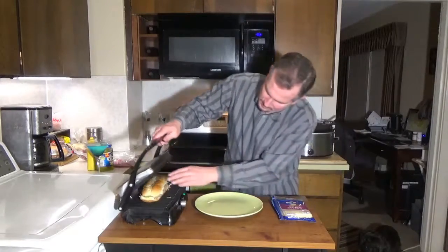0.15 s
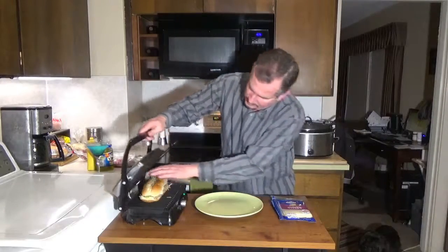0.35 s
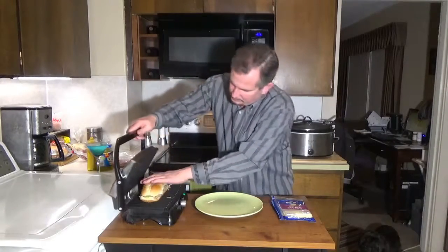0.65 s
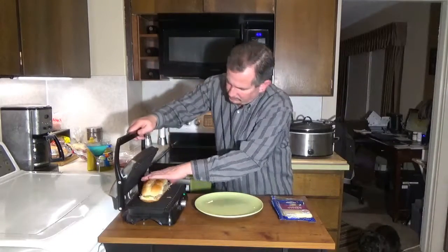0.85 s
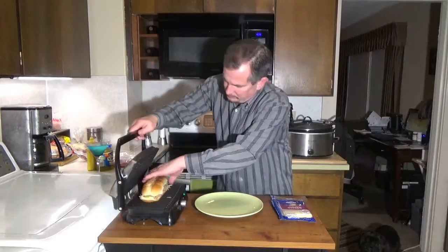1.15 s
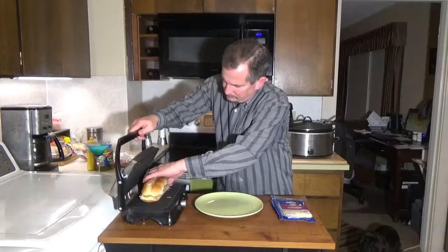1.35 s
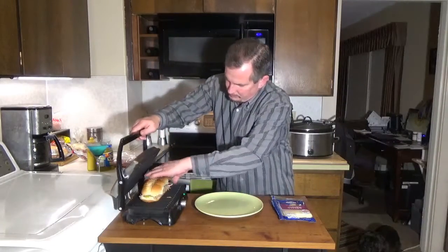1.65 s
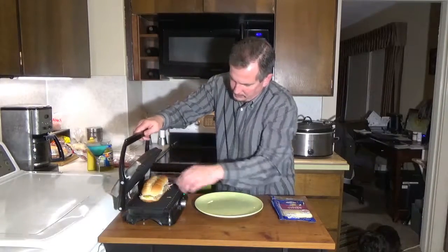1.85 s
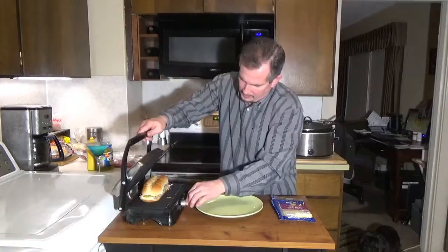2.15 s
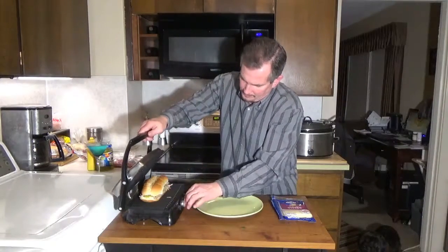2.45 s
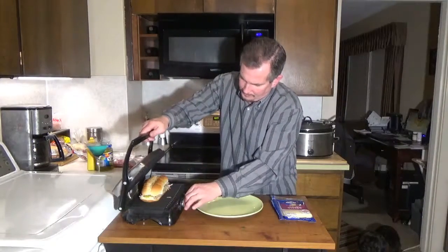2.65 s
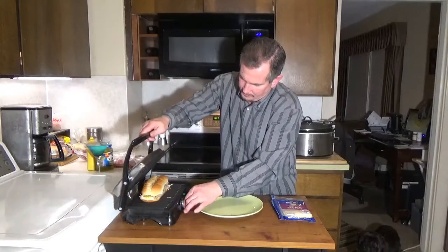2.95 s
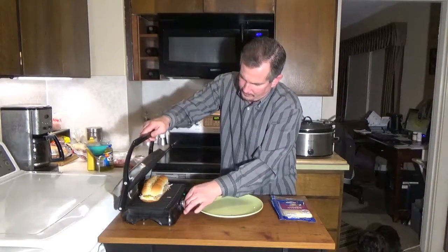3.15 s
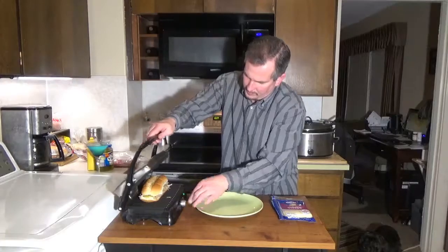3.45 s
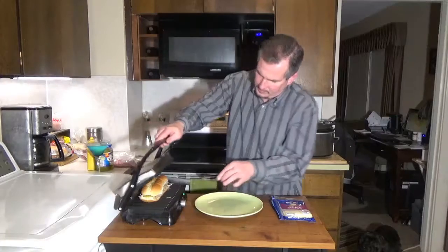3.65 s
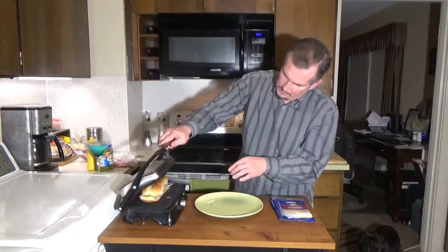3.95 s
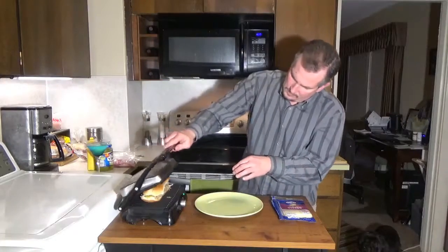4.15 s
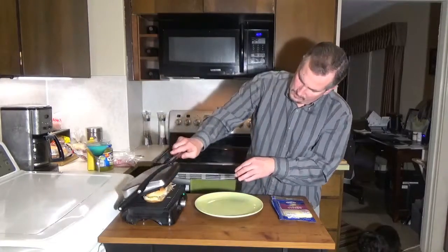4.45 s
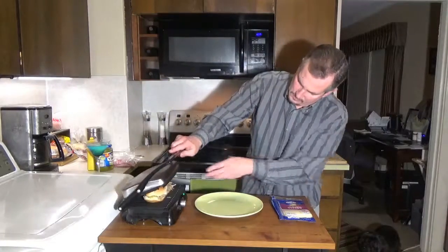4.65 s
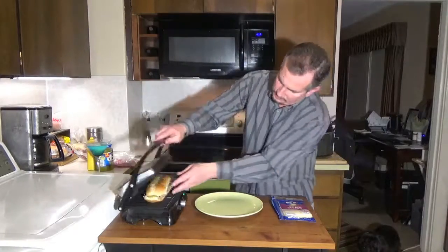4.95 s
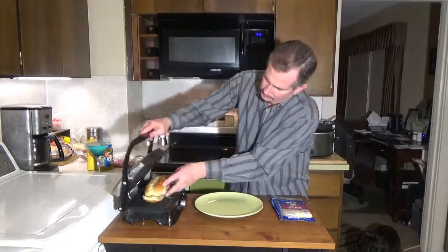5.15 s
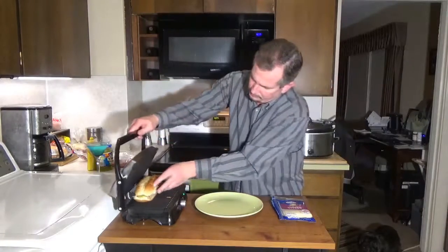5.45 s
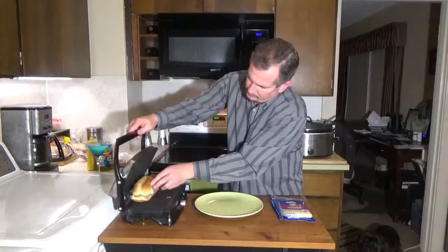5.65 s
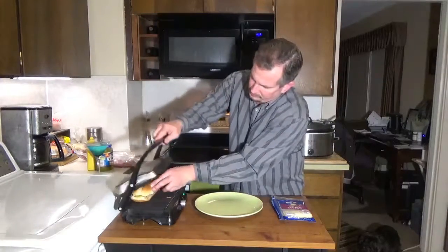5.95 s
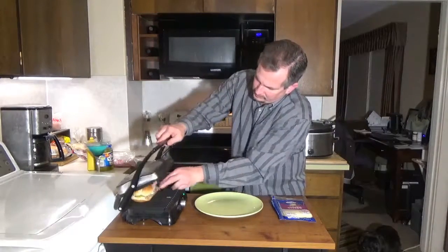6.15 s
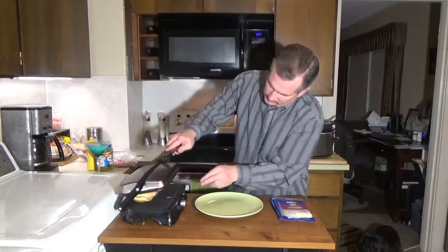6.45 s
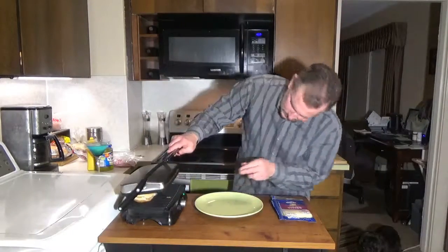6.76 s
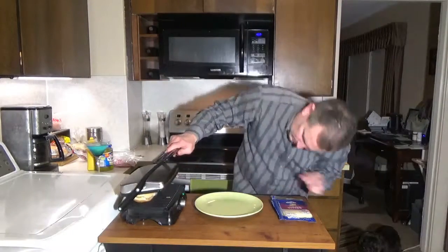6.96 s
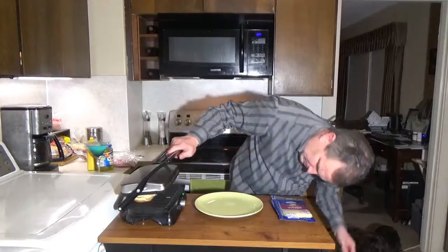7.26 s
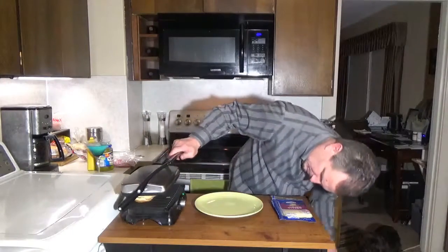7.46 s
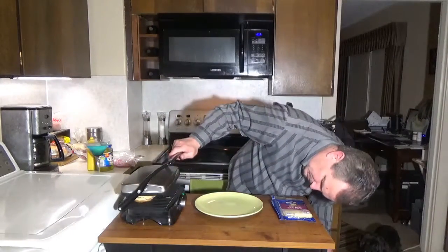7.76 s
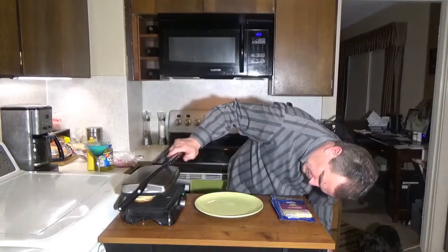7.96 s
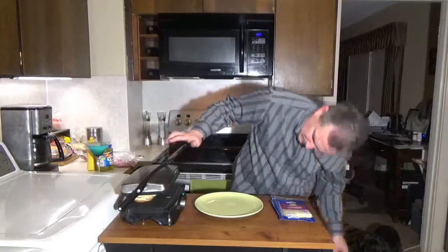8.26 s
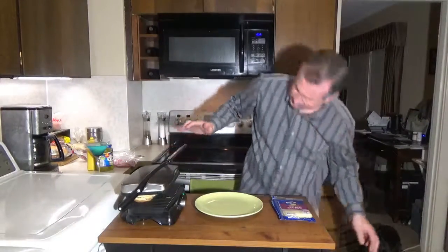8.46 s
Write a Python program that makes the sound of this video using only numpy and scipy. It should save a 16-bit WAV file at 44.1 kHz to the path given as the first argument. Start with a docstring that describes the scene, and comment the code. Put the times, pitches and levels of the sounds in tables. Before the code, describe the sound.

In a small, hard-surfaced kitchen, a refrigerator and fan hum steadily while a sandwich press sizzles faintly and ticks with heat. The handle taps and the grill plate clinks, then the dial snaps through seven sharp clicks. The sizzle swells softly, and the lid knocks and rattles as it is lowered, with a sleeve rustling. A few faint ticks follow. The microphone is fairly near, and each impact rings briefly in the room.

```python
"""A sandwich press sizzles and ticks in a small hard kitchen, over a refrigerator's hum, fan noise and
a faint focus motor. At first the handle taps, the lid knocks and a sleeve begins to rustle; at 1.7 s
the grill plate clinks. From 2.7 s the dial's spring snaps through seven detents. Then the sandwich is
squeezed and its steam swells, and from 4 to 6.7 s the lid knocks and rattles as it is lowered. The room
rings briefly after each impact. Last come a tap, two ticks and a brush of cloth."""
import sys
import numpy as np
from scipy import signal
from scipy.fft import rfft, irfft, next_fast_len
from scipy.io import wavfile

SR = 44100
rng = np.random.default_rng(int(sys.argv[2]) if len(sys.argv) > 2 else 0)


def digitize_waveform(pressure):
    """Quantize a signal to 16-bit integers and store it at the path in sys.argv[1].

    Rows of a 2-D input are taken as channels; values are limited to [-1, 1].
    """
    field = np.atleast_2d(pressure).T
    bounded = np.clip(field, -1, 1)
    quanta = np.round(bounded * 32767).astype(np.int16)
    wavfile.write(sys.argv[1], SR, quanta)


N = 379260
T = np.arange(N) / SR
RING_T = T[:SR // 2]  # time axis of one impact
SIDES = np.array([[1], [-1]])  # left, right


def undb(db):
    """Amplitude ratio of a level in decibels."""
    return 10 ** (np.asarray(db) / 20)

def level(x, db, size=None):
    """Normalisation: the rms of the first size samples (or of all) is set to db."""
    return x * undb(db) / np.sqrt(np.mean(x[..., :size] ** 2))

def shape(x, gain_at):
    """Minimum-phase filter: folding the cepstrum makes the magnitude gain_at(f) causal."""
    size = next_fast_len(len(x) // 2 + 1024) * 2
    f = np.maximum(np.fft.rfftfreq(size, 1 / SR), 1)
    cepstrum = irfft(np.log(gain_at(f) + 1e-9))
    cepstrum[1:size // 2] *= 2
    cepstrum[size // 2 + 1:] = 0
    return irfft(rfft(x, size) * np.exp(rfft(cepstrum)))[:len(x)]

def colour(x, spectrum, tilt_db=0):
    """Spectral weighting by (f/Hz, level/dB) points, tilted by tilt_db per octave above 1500 Hz."""
    hz, db = np.transpose(spectrum)
    octaves = lambda f: np.log2(np.maximum(f / 1500, 1))
    return shape(x, lambda f: undb(np.interp(np.log(f), np.log(hz), db) + tilt_db * octaves(f)))

def fade(t60):
    """Exponential damping: the level falls 60 dB in t60 seconds."""
    return undb(-60 * RING_T / max(t60, 1e-4))

def burst(t60):
    """Modal overlap: modes too dense to tell apart decay as noise."""
    return rng.standard_normal(len(RING_T)) * fade(t60)

def ring(modes, detune=0.0025):
    """Free vibration: a sum of damped sines, a little different at each blow."""
    out = np.zeros(len(RING_T))
    for hz, db, t60 in modes:
        detuned_hz = hz * (1 + detune * rng.standard_normal())
        out += undb(db) * fade(t60) * np.sin(2 * np.pi * (detuned_hz * RING_T + rng.random()))
    return out

def add(track, t, sound):
    """Superposition: a sound joins the track at t seconds."""
    start = max(int(t * SR), 0)
    track[..., start:start + sound.shape[-1]] += sound[..., :N - start]

# diffuse sound at two close microphones: f/Hz, side minus mid level/dB
SIDE_SPECTRUM = [(60, -4), (140, -19.5), (280, -17.5), (550, -11.5), (1100, -5), (4000, -6.5), (9000, -8.5)]
def diffuse(make):
    """Partial coherence of a diffuse field: independent draws form the mid and side signals."""
    return make() + SIDES * colour(make(), SIDE_SPECTRUM)

def kitchen(x, bass_t60=0.46, treble_t60=0.18, crossover_hz=4000, full_s=0.0036, build_s=0.0052):
    """Reverberation of unit energy: cupboard reflections build up within ms; the treble dies first."""
    def tail():
        bass = shape(burst(bass_t60), lambda f: 1 / np.hypot(1, f / crossover_hz))
        treble = shape(burst(treble_t60), lambda f: 1 / np.hypot(1, crossover_hz / f))
        return (bass + treble) * np.clip((RING_T - full_s) / build_s + 1, 0, 1)
    response = diffuse(tail)
    response /= np.sqrt(np.sum(response ** 2) / 2)
    return signal.fftconvolve(x[None], response, axes=1)[:, :N]

# fan rumble and microphone hiss: f/Hz, relative level/dB
AIR_SPECTRUM = [(25, -17), (60, -25.5), (125, -9), (205, 3.5), (265, -1), (385, 2), (470, -5), (650, -9.5),
                (900, -11.5), (1200, -18.5), (2200, -22), (4500, -27), (8500, -29.5), (11000, -30)]
def fan_and_hiss(db=-50.5):
    """Stationary broadband noise: a fan rumbles under an even hiss."""
    return level(diffuse(lambda: colour(rng.standard_normal(N), AIR_SPECTRUM)), db)

# tones of the compressor and fans: f/Hz, rms level/dB
HUM_LINES = [(59.4, -70), (80.7, -66), (101, -73), (119.9, -61), (161.6, -62), (178, -68), (197.0, -62),
             (197.6, -52.7), (237.4, -65), (281.9, -68), (296.7, -60), (317.6, -60), (324, -67), (356, -59),
             (415.3, -63), (474.8, -71)]
def refrigerator(wander_rad=0.17):
    """Line spectrum of motors: the phases wander slowly, and two close tones beat."""
    knots = np.linspace(0, T[-1], num=18)
    out = np.zeros(N)
    for hz, db in HUM_LINES:
        drift = wander_rad * np.interp(T, knots, rng.standard_normal(len(knots)))
        out += np.sqrt(2) * undb(db) * np.sin(2 * np.pi * (hz * T + rng.random()) + drift)
    return out

# runs of a lens focus motor: start t/s, end t/s, whine f/Hz, level/dB
MOTOR_RUNS = [(0, 7.67, 4025, -72.3), (7.67, 7.9, 3330, -69.5), (8.11, 8.18, 3300, -68)]
def focus_motor(steps_per_s=29.97, pulse_s=0.0053, jitter_hz=60, uneven_db=1.8):
    """Pulse modulation: the motor whines in short steps of uneven pitch and strength."""
    step, phase = np.divmod(T * steps_per_s, 1)
    detune, force = rng.standard_normal((int(step[-1]) + 1, 2))[step.astype(int)].T
    pulses = np.exp(-((phase - 0.5) / steps_per_s / pulse_s) ** 2) * undb(uneven_db * force)
    out = np.zeros(N)
    for start, end, hz, db in MOTOR_RUNS:
        whine = np.sin(2 * np.pi * np.cumsum(hz + jitter_hz * detune) / SR)
        out += level(pulses * whine, db) * (T >= start) * (T < end)
    return out

# steam bursts: f/Hz, relative level/dB
STEAM_SPECTRUM = [(500, -28), (3000, -21), (5500, -5.5), (8000, -4.5), (9800, -0.5), (11000, -9),
                  (13000, -12.5)]
# the sandwich is squeezed on the hot plate: start t/s, end t/s, full level/dB, build-up time/s
SANDWICH_SQUEEZES = [(0, 0.25, -60, 0.018), (3.2, 4.8, -54, 1.25), (4.92, 5.423, -54.7, 0.03),
                     (5.93, 8.6, -64, 0.021)]
def sizzle(pops_per_s=1800, spread_db=3.5, simmer_db=-61.5, release_s=0.11):
    """Shot noise of tiny steam bursts: it swells under a squeeze, then relaxes to a simmer."""
    pops = (rng.random(N) < pops_per_s / SR) * rng.choice([-1, 1], N)
    sizes = undb(spread_db * np.minimum(rng.exponential(size=N), 7))
    steam = colour(pops * sizes, STEAM_SPECTRUM)
    power = undb(simmer_db) ** 2
    for start, end, db, build_s in SANDWICH_SQUEEZES:
        build = 1 - np.exp(-np.maximum(T - start, 0) / build_s)
        release = np.exp(-np.maximum(T - end, 0) / release_s)
        power += (undb(db) * build * release) ** 2
    return level(steam + kitchen(steam), 0) * np.sqrt(power)

# rubbing cloth: f/Hz, relative level/dB
CLOTH_SPECTRUM = [(200, -21), (600, 12.5), (1200, 6.5), (2500, 4.5), (4500, 2.5), (7000, 4), (9800, 1.5),
                  (11000, 1.5)]
# reaches of the arm: fastest at t/s, relative level/dB, length/s
ARM_STROKES = [(0.17, -54.5, 0.62), (0.95, -62, 0.7), (2.098, -58, 0.27), (3.28, -51, 0.28),
               (3.952, -55.5, 1), (4.75, -49.5, 0.32), (5.056, -51.5, 0.17), (5.43, -48.5, 0.22),
               (5.76, -55, 0.25), (6.09, -53, 0.14), (6.298, -45, 0.12), (6.88, -54.5, 0.45),
               (8.47, -52, 0.18)]
def sleeve(grain_db=2.0, gain_db=-1, stir_db=-56.5, rise_share=0.55):
    """Stick-slip friction: fibres shed grains of noise that swell and die with the arm's speed."""
    def fibres():
        grains = undb(grain_db * np.repeat(rng.standard_normal(N // 64 + 1), 64)[:N])
        return colour(rng.standard_normal(N) * grains, CLOTH_SPECTRUM)
    power = undb(stir_db) ** 2  # the cloth also stirs between strokes
    for t, db, length_s in ARM_STROKES:
        width_s = length_s * np.where(T < t, rise_share, 1 - rise_share)
        power += undb(db) ** 2 * np.exp(-((T - t) / width_s) ** 2)
    return level(diffuse(fibres), gain_db) * np.sqrt(power)

# taps of the plastic handle: t/s, level/dB, resonance f/Hz, sharpness Q
HANDLE_TAPS = [(0.019, -51.5, 4000, 3.9), (0.073, -41.5, 2600, 3.6), (4.3839, -41.5, 3570, 0.6),
               (6.871, -45.5, 2300, 1.4)]
def handle(t60=0.026):
    """Damped resonance: each tap excites one broad band of the handle."""
    out = np.zeros(N)
    for t, db, hz, q in HANDLE_TAPS:
        resonance = lambda f: 1 / (1 + (q * (f / hz - hz / f) / 2) ** 2) ** 2
        add(out, t, level(shape(burst(t60), resonance), db, size=220))
    return out + kitchen(out)

# a dry tick: f/Hz, relative level/dB
TICK_SPECTRUM = [(60, -35), (300, -3), (1000, -6), (2200, 4.5), (4000, 3), (7000, 5.5), (10500, 6),
                 (13000, -9)]
# ticks of the hot plates and the crust: t/s, level/dB
HEAT_TICKS = [(0.0394, -45.5), (0.7199, -43), (1.2645, -49), (1.3703, -50.5), (1.821, -41.5),
              (1.9239, -31.5), (3.8826, -41), (3.9095, -43), (3.9769, -46.5), (4.4472, -42.5),
              (4.798, -36.5), (5.3915, -43), (6.2601, -33.5), (7.2329, -44), (7.9888, -47)]
def ticks(typical_db=-41, crackle_db=-23):
    """Impulsive release: weaker ticks come from smaller spots, so are brighter and stir the room less."""
    out, to_room = np.zeros(N), np.zeros(N)
    for t, db in HEAT_TICKS:
        excess_db = db - typical_db
        release = (RING_T == 0) + undb(crackle_db) * burst(t60=0.02)
        tick = level(colour(release, TICK_SPECTRUM, tilt_db=1.1 - 0.2 * excess_db), db, size=176)
        add(out, t, tick)
        add(to_room, t, tick * undb(-2.5 + 0.22 * excess_db))
    return out + kitchen(to_room)

# modes of the grill plate: f/Hz, relative level/dB, T60/s
GRILL_MODES = [(806, -2, 0.13), (898, -6.5, 0.23), (1464, -8.5, 0.5), (2540, 2, 0.034), (3330, 1, 0.053),
               (4100, -16, 0.065), (5140, 2, 0.056), (5580, 4, 0.06), (5600, -9, 0.33), (5900, -11, 0.096),
               (6150, 10.5, 0.027), (6120, 1, 0.054), (8840, 5.5, 0.05), (9050, -1, 0.046),
               (9200, -12, 0.064)]
# the plate clinks in its seat: t/s, level/dB
GRILL_CLINKS = [(1.7232, -34.5)]
def grill_plate(scrape_t60=0.19, scrape_db=-3, room_db=-4):
    """Inharmonic plate modes ring over a scrape, which shares the spectrum of the dial's snap."""
    out = np.zeros(N)
    for t, db in GRILL_CLINKS:
        scrape = level(colour(burst(scrape_t60), SNAP_SPECTRUM), scrape_db, size=441)
        body = level(ring(GRILL_MODES), 0, size=441)
        add(out, t, level(scrape + body, db, size=441))
    return out + undb(room_db) * kitchen(out)

# modes of the lid and base: f/Hz, relative level/dB, T60/s
BODY_MODES = [(159, -8, .25), (205, -4, .25), (250, -6, .2), (377, 1, .4), (443, -7, .3), (492, -5, .35),
              (590, -10, .25), (624, -6, .55), (750, -6, .22), (882, -1, .32), (935, -2, .27),
              (1004, -1, .35), (1091, 2, .3), (1192, -11, .3), (1464, -12, .3), (1541, -8, .26),
              (1760, -11, .18), (2369, -10, .24), (2556, -4, .3), (2720, -4, .26), (2993, -5, .22),
              (3494, -9, .2), (4829, -15, .2)]
# the lid's loose parts: f/Hz, relative level/dB
CLATTER_SPECTRUM = [(100, -5), (200, 3.5), (550, 4.5), (1050, -2.5), (1300, -2), (1800, 0.5), (2200, -7.5),
                    (2900, 3.5), (4000, -5), (5500, 2.5), (10000, -11)]
# knocks of the lid: t/s, level/dB, upper cutoff f/Hz
LID_KNOCKS = [(0.262, -46.5, 5000), (0.27, -43.5, 2700), (2.58, -51, 2000), (4.039, -53.5, 1200),
              (4.276, -43.5, 1550), (4.385, -51, 2400), (4.561, -48, 503), (4.581, -29.5, 3100),
              (4.604, -33.5, 1150), (4.983, -46, 1350), (5.178, -51, 1200), (5.578, -52, 1400),
              (6.236, -43.5, 800), (6.253, -40, 865), (6.403, -48.5, 1000), (6.725, -42.5, 1720)]
def lid(clatter_t60=0.091, bounces=4, bounce_db=-8, part_db=-4, clatter_room_db=-1, body_room_db=-9):
    """Impact and rebound of the loose top plate: soft contacts lose the treble, light ones the bass."""
    out, to_room = np.zeros(N), np.zeros(N)
    for t, db, top_hz in LID_KNOCKS:
        weight = 2 ** ((db + 45) / 12)  # 12 dB more reaches an octave lower and rattles twice as long
        low_hz, rattle_s = 310 / weight, 0.02 * weight
        clatter = colour(burst(clatter_t60), CLATTER_SPECTRUM)
        for delay_s in rng.random(bounces) * rattle_s:
            bounce = undb(bounce_db) * colour(burst(clatter_t60 / 2), CLATTER_SPECTRUM)
            clatter += np.pad(bounce, (int(delay_s * SR), 0))[:len(RING_T)]
        contact = lambda f: 1 / np.hypot(1, (f / top_hz) ** 3) / np.hypot(1, (low_hz / f) ** 2)
        clatter = level(shape(clatter, contact), db + part_db, size=1323)
        body = level(shape(ring(BODY_MODES), contact), db + part_db, size=1323)
        add(out, t, clatter + body)
        add(to_room, t, undb(clatter_room_db) * clatter + undb(body_room_db) * body)
    return out + kitchen(to_room)

# modes of a spring inside the dial: f/Hz, relative level/dB, T60/s
TWANG_MODES = [(780, 1.5, 0.41), (814, -1.5, 0.3), (1308, -16, 1)]
# the spring is struck: t/s, level/dB
SPRING_TWANGS = [(2.727, -40.5)]
def dial_spring(room_db=-10):
    """Lightly damped vibration: the struck spring rings on."""
    out = np.zeros(N)
    for t, db in SPRING_TWANGS:
        add(out, t, level(ring(TWANG_MODES), db, size=4410))
    return out + undb(room_db) * kitchen(out)

# first contact of the detent spring, and its snap: f/Hz, relative level/dB
CRACK_SPECTRUM = [(100, -27), (2000, -17), (5000, -8), (9500, 4.5), (11000, -7)]
SNAP_SPECTRUM = [(50, -33), (200, -15), (800, -3), (2000, -5), (3500, 3), (7000, 2), (9500, -11),
                 (11000, -2.5)]
# modes of the dial's housing: f/Hz, relative level/dB, T60/s
HOUSING_MODES = [(1488, -11.5, 0.11), (2820, 1, 0.027), (3430, -4, 0.013), (4210, 3, 0.027),
                 (4870, -6, 0.016), (5370, 6, 0.026), (6200, 6, 0.016), (6500, 6, 0.016), (7200, 6, 0.028),
                 (7550, -2, 0.052), (8800, 9.5, 0.014), (9100, -10, .015), (9460, 9, 0.01),
                 (10300, 0, 0.013)]
# clicks of the dial: t/s, level/dB, treble tilt/(dB per octave)
DIAL_DETENTS = [(2.6894, -21.5, 1.1), (2.7251, -21.5, 0), (2.7579, -23, 0.4), (2.8354, -20.5, 1.8),
                (2.8715, -20, 2), (2.9563, -21, 2), (3.1245, -22, -0.6)]
def dial(slide_s=0.012, slide_db=-30, room_db=-0.5, housing_room_db=-6, beam_hz=7800):
    """Release of elastic energy: at each detent a spring slides up a ramp, then strikes the housing."""
    out = np.zeros((2, N))
    attack = 176  # samples, 4 ms
    flat = [(1000, 0), (11000, 0)]
    slide_band = lambda f: 1 / np.hypot(1, f / 2500) / np.hypot(1, 600 / f)
    for t, db, tilt_db in DIAL_DETENTS:
        slide = shape(rng.standard_normal(600), slide_band) * np.hanning(600)
        add(out, t - slide_s, level(slide, db + slide_db))
        crack = level(colour(burst(t60=0.0041), CRACK_SPECTRUM), -2, attack)
        snap = level(colour(burst(t60=0.018), SNAP_SPECTRUM), -1, attack)
        housing = level(ring(HOUSING_MODES), 0, attack)
        def click(housing_gain):
            return level(colour(crack + snap + housing_gain * housing, flat, tilt_db), db, attack)
        add(out, t, click(housing_gain=0.98))
        # directivity: the housing and the treble beam forward and reach the walls less
        to_room = shape(click(undb(housing_room_db)), lambda f: 1.18 / np.hypot(1, (f / beam_hz) ** 2))
        add(out, t, undb(room_db) * kitchen(to_room))  # the moving hand changes the reflections
    return out

def scene(pan_db=0.6):
    """A level difference between the channels sets the press a little left, before the background."""
    background = fan_and_hiss() + refrigerator() + focus_motor()
    press = sizzle() + sleeve() + handle() + ticks() + grill_plate() + lid() + dial_spring() + dial()
    return background + press * undb(SIDES * pan_db / 2)

def record(dry):
    """Band limiting: a steep linear-phase low-pass cuts the top treble."""
    lowpass = signal.firwin(701, cutoff=11060, fs=SR)
    return signal.fftconvolve(dry, lowpass[None], mode="same", axes=1)


dry = scene()
out = record(dry)
digitize_waveform(out)
```